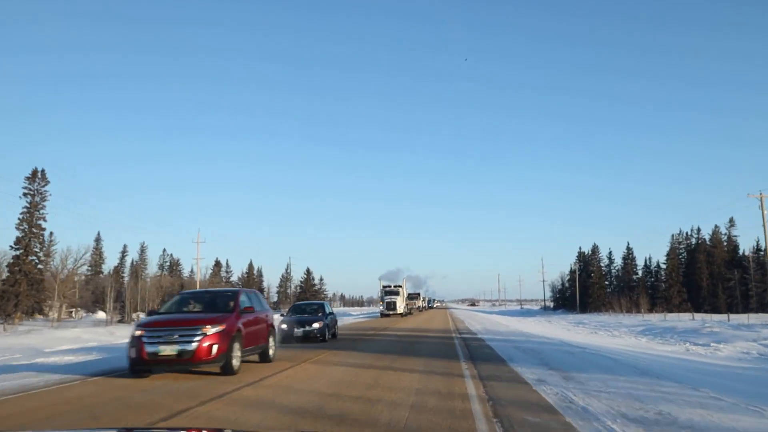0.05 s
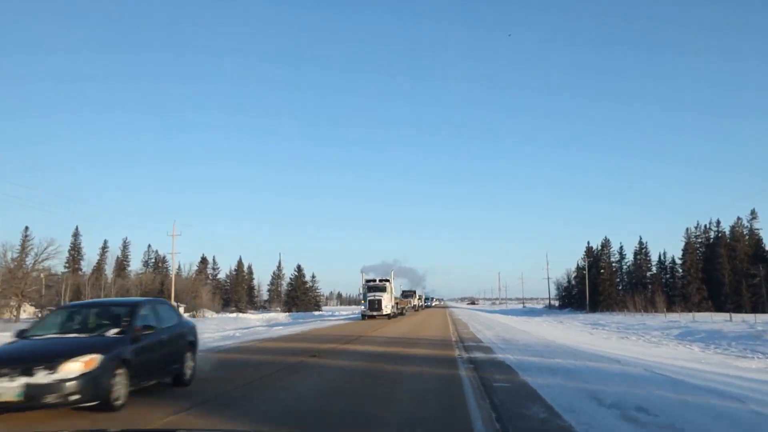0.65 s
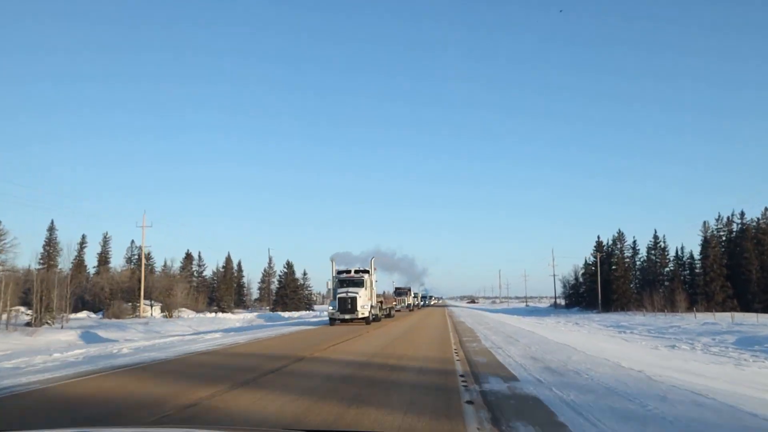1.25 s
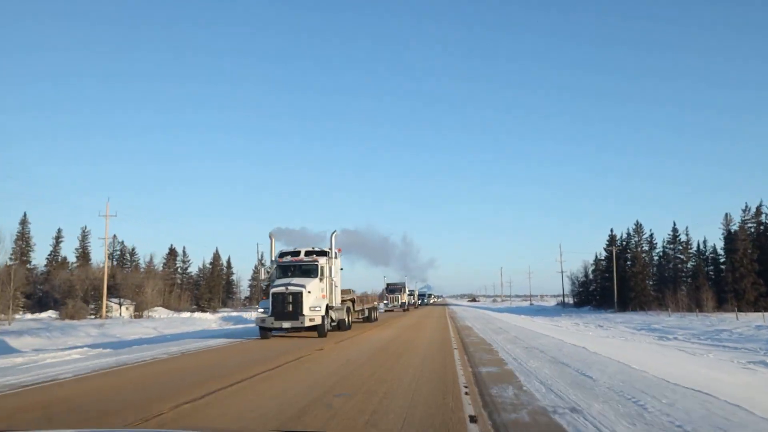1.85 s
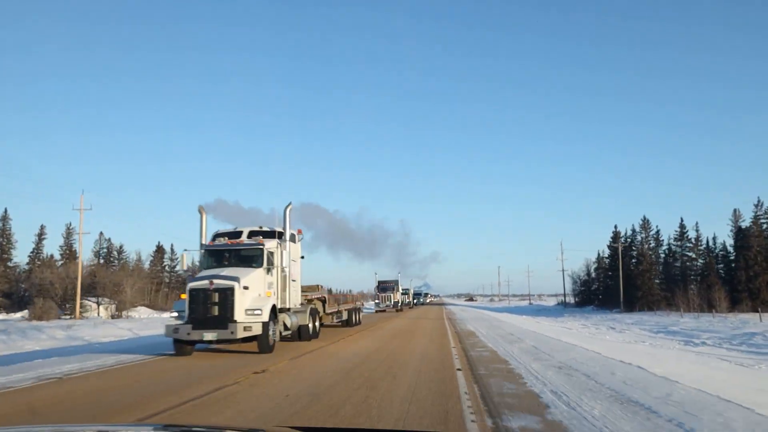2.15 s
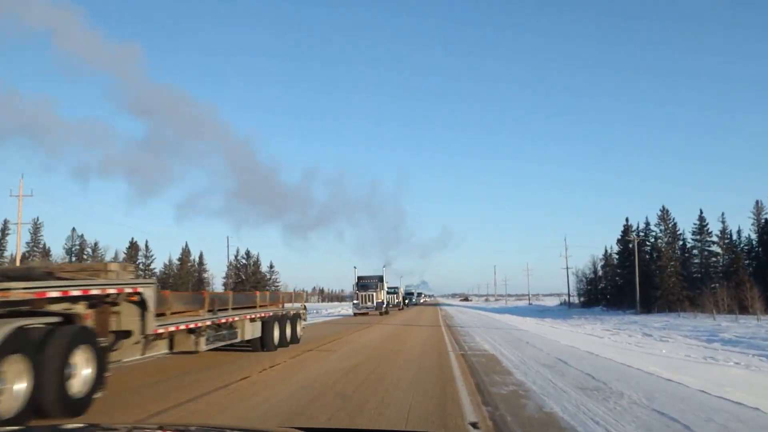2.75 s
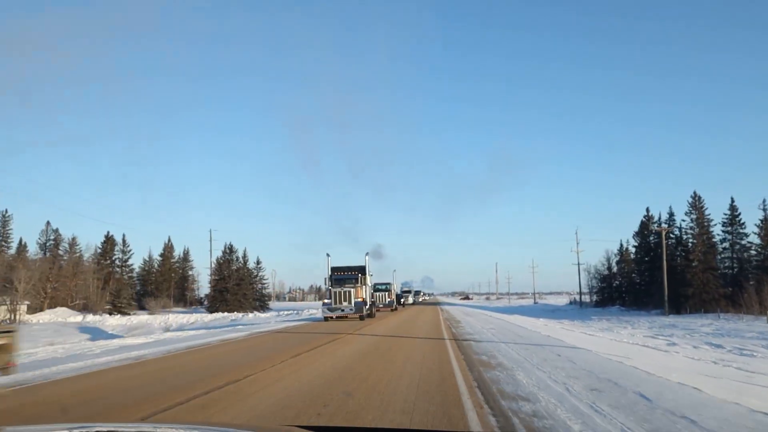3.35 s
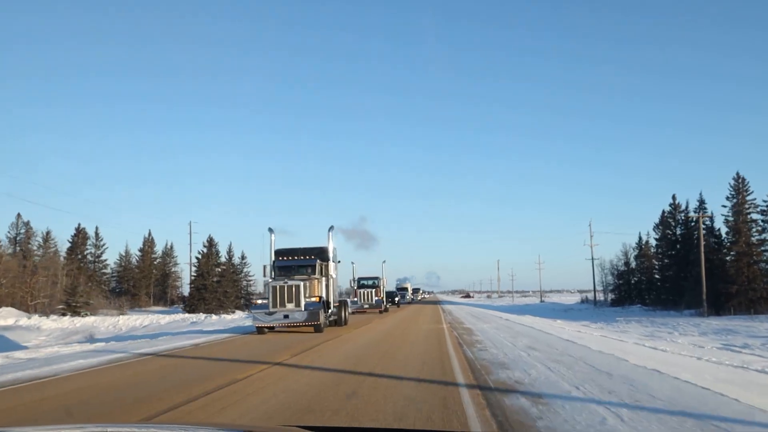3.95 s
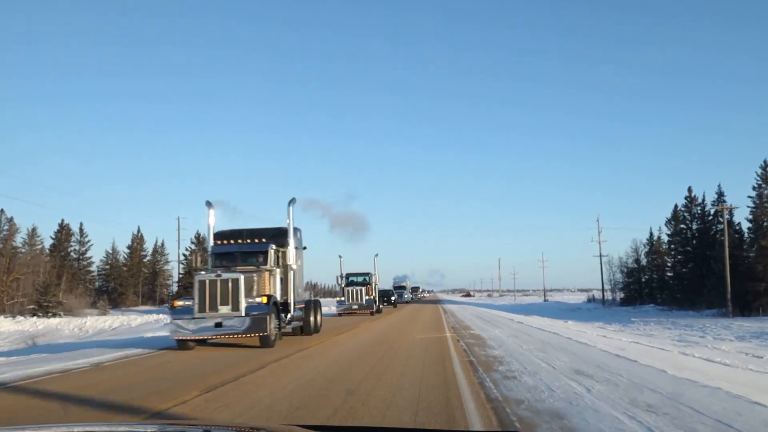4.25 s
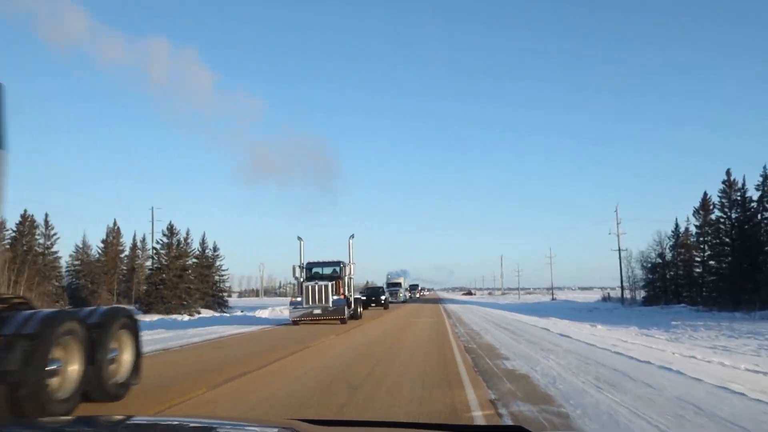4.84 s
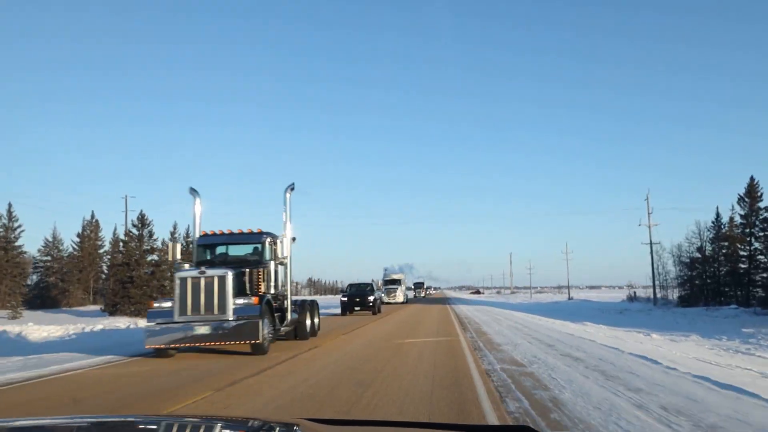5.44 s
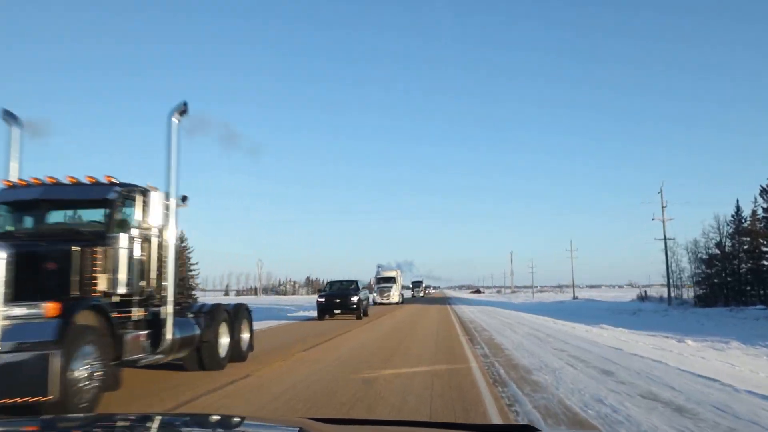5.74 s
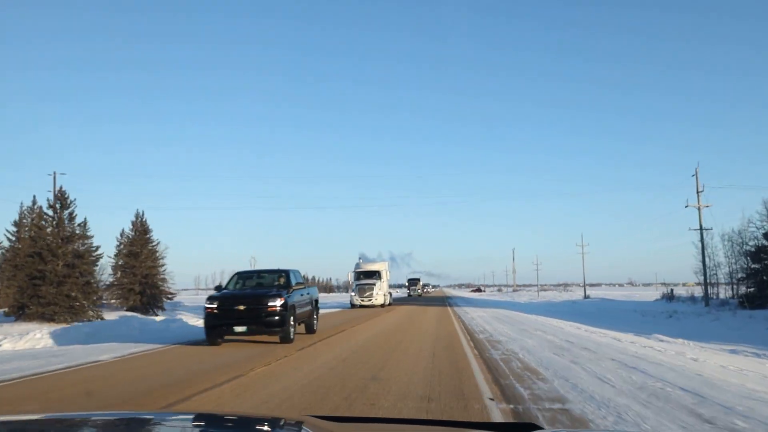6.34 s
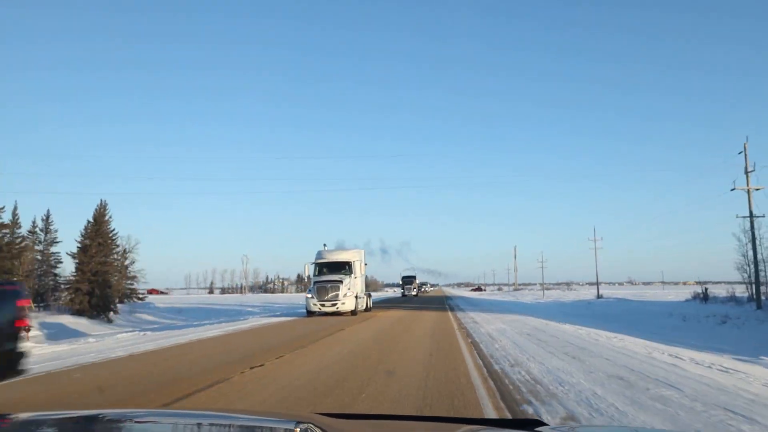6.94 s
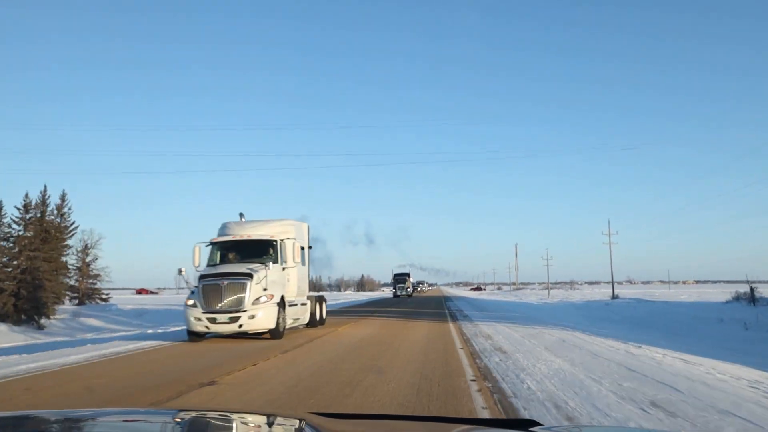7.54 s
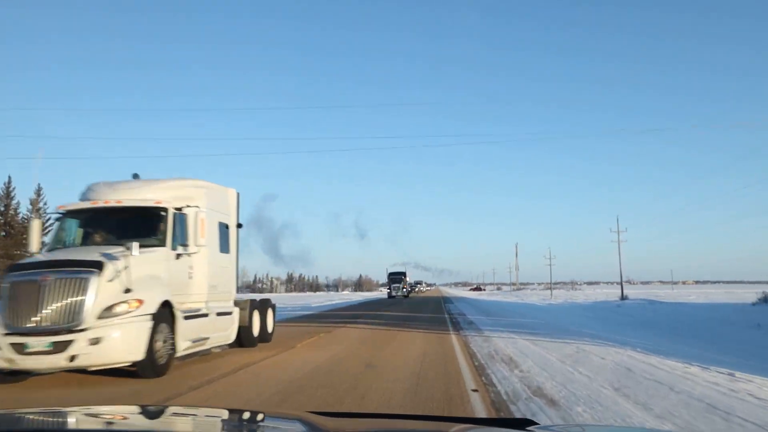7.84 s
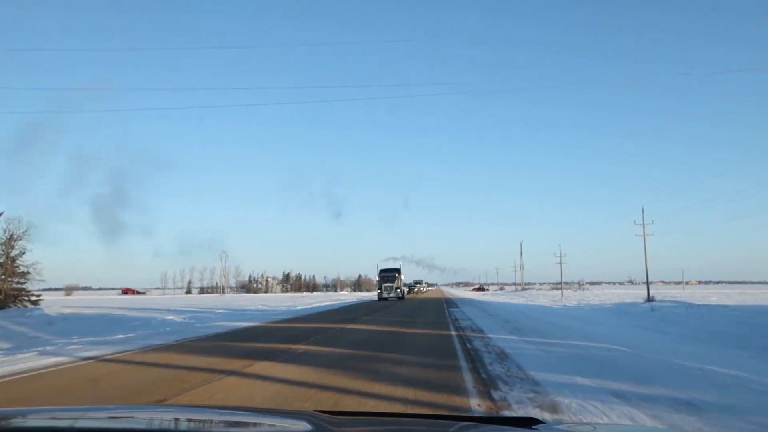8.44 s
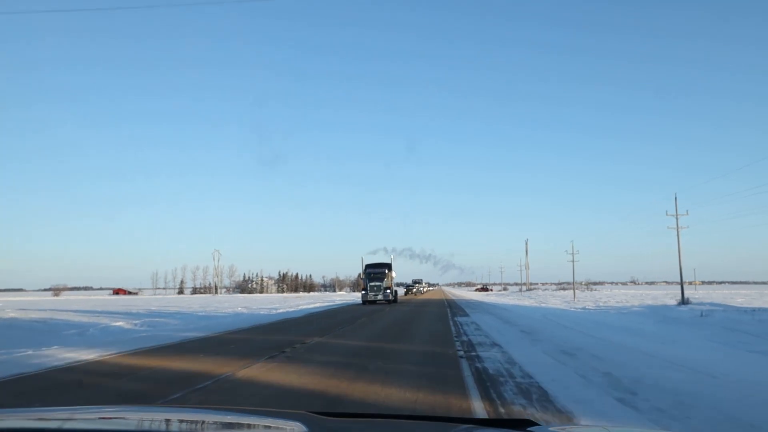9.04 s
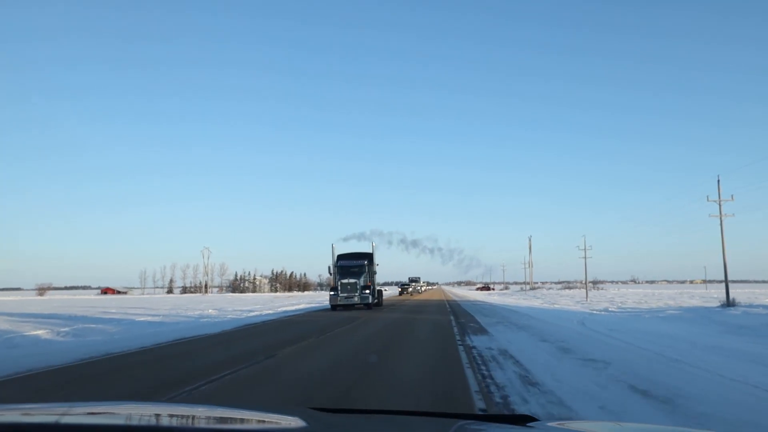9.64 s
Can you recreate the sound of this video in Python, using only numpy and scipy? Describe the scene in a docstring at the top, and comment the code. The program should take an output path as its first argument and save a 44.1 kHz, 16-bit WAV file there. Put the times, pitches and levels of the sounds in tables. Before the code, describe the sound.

From inside a cruising car, tyres roar and air hisses as traffic passes the other way, with soft bumps and faint trim ticks.

```python
"""Inside a car cruising on a winter highway, with cars and heavy trucks passing the other way.
The engine hums, the road rumbles through the body, tyres roar and air hisses on the glass.
Loose trim buzzes, ticks and squeaks. Bumps and passing traffic give short low thuds; bumps and
bow waves shake the cabin. Each truck's exhaust throbs, then drops in pitch as it goes by.
The camera's gain control ducks everything after each big thump."""
import sys
import numpy as np
from scipy.fft import rfft, irfft, next_fast_len
from scipy.io import wavfile
from scipy.ndimage import uniform_filter1d, map_coordinates

SR = 44100
rng = np.random.default_rng(int(sys.argv[2]) if len(sys.argv) > 2 else 0)


def unload_audio(sound):
    """Save the sound as a 16-bit wav file, at the path given as the first command line argument."""
    columns = np.transpose(np.atleast_2d(sound))
    # keep every value between -1 and 1, then stretch to whole-number steps
    steps = np.round(np.clip(columns, -1, 1) * 32767)
    wavfile.write(sys.argv[1], SR, steps.astype(np.int16))


N = 427329
TIME_S = np.arange(N) / SR
BURST_S = np.arange(SR // 4) / SR  # time axis of one tick or thud


def amp(db):
    """Decibels to gain."""
    return 10 ** (np.asarray(db) / 20)


def unit(x):
    """Scaled to rms 1."""
    return x / np.sqrt(np.mean(x ** 2) + 1e-20)


def curve(rows):
    """(time, value) points to one value per sample."""
    return np.interp(TIME_S, *np.transpose(rows))


def wobble(rate_hz):
    """Smooth random curve with knots at rate_hz."""
    knots = rng.standard_normal(int(N * rate_hz / SR) + 4)
    return map_coordinates(knots, [TIME_S * rate_hz])


def filtered(x, response):
    """x through a frequency response."""
    size = next_fast_len(N + SR // 2)
    return irfft(rfft(x, size) * response(np.fft.rfftfreq(size, 1 / SR)), size)[:N]


def colour(spectrum, hz):
    """Gain from (frequency, level) points joined on a log axis."""
    points_hz, db = np.transpose(spectrum)
    return amp(np.interp(np.log(hz + 1), np.log(points_hz), db))


def noise(spectrum):
    """Coloured noise, rms 1."""
    return unit(filtered(rng.standard_normal(N), lambda hz: colour(spectrum, hz)))


def evened(x, span_s):
    """x with swells slower than span_s levelled out, rms 1."""
    size = int(span_s * SR)
    power = uniform_filter1d(uniform_filter1d(x ** 2, size), size)
    return unit(x / np.sqrt(np.abs(power) + 1e-9))


def firing_note(hz, db, octave_db, rough_db, jitter_rad):
    """Cylinder firing tone plus octave, fluttering in level and timing."""
    phase = 2 * np.pi * np.cumsum(hz) / SR + jitter_rad * wobble(22)
    note = np.sin(phase) + amp(octave_db + 2.2 * wobble(4)) * np.sin(2 * phase)
    return amp(db + rough_db * wobble(14)) * unit(note)


# Engine pitch: (time [s], firing rate [Hz])
ENGINE_HZ = [(0, 93), (.4, 99), (1.2, 102.5), (2.7, 97.5), (3.5, 101), (4.3, 101.5), (4.7, 97), (5.5, 95.5),
             (8.2, 97), (9.69, 93.5)]
# Engine hum: (time [s], level [dB])
ENGINE_DB = [(0, -25.5), (.22, -15), (.65, -19), (.85, -21.5), (1.05, -16), (1.4, -16.5), (1.8, -19),
             (2.35, -20), (2.8, -13.5), (3.15, -23.5), (3.45, -22), (3.9, -14.5), (4.4, -15), (4.8, -19),
             (5.4, -17.5), (7.6, -19.5), (9.69, -18)]


def engine():
    """The car's own firing note follows the cruising speed."""
    return firing_note(curve(ENGINE_HZ), curve(ENGINE_DB), octave_db=-13.5, rough_db=2.5, jitter_rad=.16)


# Oncoming vehicles and rough patches, re steady level:
# (peak time [s], roar [dB], hiss [dB], half-width [s])
SWELLS = [(0.141, -2.5, -6.5, 0.22), (0.373, -7.5, -3.5, .045), (1.3, -5, -8.5, .15),
          (1.567, 0, -5.5, 0.082), (2.661, -6, -2.5, 0.16), (4.299, -11, -7, .3), (4.976, -2, -2.5, 0.18),
          (5.781, -2, -1.5, 0.073), (6.321, -6, -5, 0.2), (6.798, -5, -5.5, 0.095), (7.97, -4, -2.5, 0.31),
          (8.902, -7, -4, 0.36)]


def swells():
    """Added roar and hiss power; each swell falls off with distance squared."""
    roar = hiss = 0
    for peak_s, roar_db, hiss_db, half_width_s in SWELLS:
        spreading = 1 + ((TIME_S - peak_s) / half_width_s) ** 2
        roar += amp(roar_db) ** 2 / spreading
        hiss += amp(hiss_db) ** 2 / spreading
    return roar, hiss


# Suspension sway: (frequency [Hz], relative density [dB])
SWAY_SPECTRUM = [(10, -32), (20, -21), (29, -12.5), (37, -11), (44, -3), (54, -1), (64, -1), (85, -1),
                 (110, -3), (135, -14), (200, -45), (500, -120)]
# Body panel rumble: (frequency [Hz], relative density [dB])
PANEL_SPECTRUM = [(20, -61), (100, 0), (120, 2), (155, -2.5), (192, 0.5), (208, -4), (225, -0.5),
                  (275, -6.5), (340, -10), (400, -22), (550, -63), (1500, -120)]


def road(roar_power, coupling_db=-4):
    """Coarse pavement sways the suspension and shakes the panels; swells add to the shaking."""
    sway = amp(-21) * evened(noise(SWAY_SPECTRUM), span_s=.44)
    panels = amp(-18.5) * evened(noise(PANEL_SPECTRUM), span_s=.21)
    return sway + panels * np.sqrt(1 + amp(coupling_db) ** 2 * roar_power)


# Tyre roar: (frequency [Hz], relative density [dB])
TYRE_SPECTRUM = [(60, -59.5), (390, -4), (440, -2), (510, 1), (660, -3.5), (810, -3.5), (900, -7.5),
                 (1020, -6.5), (1250, -9), (1400, -8.5), (1550, -16), (2000, -25.5), (7000, -120)]
# Air on the glass: (frequency [Hz], relative density [dB])
AIR_SPECTRUM = [(300, -72), (1600, 5), (1950, 1), (2500, 0.5), (3000, -4.5), (3350, -2.5), (3700, -4),
                (4300, -12), (4900, -13.5), (5300, -21), (6200, -22), (8000, -29.5), (11000, -30.6),
                (15600, -35.5)]


def tyres_and_air(roar_power, hiss_power):
    """Tyre roar and air hiss, ruffled by turbulence, swelling as traffic passes."""
    gust = wobble(17)
    tyres = amp(-29 + .51 * gust) * evened(noise(TYRE_SPECTRUM), span_s=.78)
    air = amp(-42.5 + .12 * gust + .36 * wobble(40)) * noise(AIR_SPECTRUM)
    return tyres * np.sqrt(1 + roar_power) + air * np.sqrt(1 + hiss_power)


# Trim contact snap: (frequency [Hz], relative density [dB])
SNAP_SPECTRUM = [(800, -30), (2000, -7), (3500, 0), (4800, -3), (6400, -5), (9000, -9.5), (13000, -17),
                 (15600, -23)]


def trim_chatter(level_db=-68, swing_db=3.5):
    """Vibrating loose trim buzzes faintly, in fits."""
    fits = unit(wobble(7) + wobble(25))
    return amp(level_db + swing_db * fits) * noise(SNAP_SPECTRUM)


def trim_contacts(rows, q, rise_share=.1):
    """Plastic contacts: noise bursts, each a dull resonance plus a broad snap."""
    out, t = np.zeros(N + SR), BURST_S
    hz = np.fft.rfftfreq(len(t), 1 / SR) + 1
    scrape = lambda band: unit(irfft(rfft(rng.standard_normal(len(t))) * band, len(t)))
    for start_s, db, centre_hz, snap_db, t60_s in rows:
        lowpass = 1 / (1 + (hz / (1.7 * centre_hz)) ** 4)
        resonance = lowpass / (1 + 1j * q * (hz / centre_hz - centre_hz / hz)) ** 2
        contact = amp(db) * scrape(resonance) + amp(snap_db) * scrape(colour(SNAP_SPECTRUM, hz))
        burst = amp(-60 * t / t60_s) * (1 - np.exp(-(t / (rise_share * t60_s)) ** 2))
        out[round(start_s * SR):][:len(t)] += burst / burst.max() * contact
    return out[:N]


# Trim ticks: (time [s], resonance [dB], centre [Hz], snap [dB], t60 [s])
TRIM_TICKS = [(.345, -55, 3500, -57, .14), (.776, -37, 3300, -50, .08), (.803, -38.5, 2300, -68, .09),
              (.805, -40.5, 3500, -70, .08), (.852, -52, 4500, -58, .08), (1.125, -52, 3500, -60, .15),
              (1.371, -49, 3600, -50.5, .12), (1.582, -54, 3700, -54, .11), (2.1, -44.5, 3400, -51.5, .09),
              (2.174, -53, 5200, -59.5, .08), (2.27, -50, 3800, -59, .06), (2.708, -49, 3700, -60, .07),
              (3.209, -53, 5600, -62, .035), (3.308, -53, 3700, -61, .09), (4.254, -44, 3650, -70, .06),
              (4.426, -39, 3000, -62, .075), (4.482, -57, 11000, -53.5, .08), (4.623, -58, 6000, -55, .08),
              (4.772, -52, 3700, -59, .06), (4.848, -63, 10500, -57, .08), (5.053, -49, 3600, -57, .07),
              (5.113, -42, 3500, -58, .07), (5.54, -36, 3300, -52, .09), (5.794, -46, 3600, -56, .09),
              (8.284, -43, 3500, -52, .13), (8.65, -55, 6000, -63, .06), (9.047, -46, 3600, -53.5, .14),
              (9.512, -54, 5400, -61, .035)]


def trim_ticks(faint_count=22, snap_db=-65, t60_s=.06):
    """Loose trim taps with a broad resonance; faint ticks are scattered between the listed ones."""
    faint = []
    for _ in range(faint_count):
        start_s, db = rng.uniform(0, N / SR), rng.normal(-54, 1.5)
        centre_hz = 3500 * rng.lognormal(0, .1)
        faint.append((start_s, db, centre_hz, snap_db, t60_s))
    return trim_contacts(TRIM_TICKS + faint, q=1.8)


# Cabin thuds: (time [s], level [dB], pitch [Hz])
THUDS = [(.405, -6, 100), (.436, -11.5, 232), (.449, 1, 80), (0.501, -10, 65), (0.576, -1, 85),
         (0.955, -6, 100), (1.012, -7, 100), (1.611, -1.5, 151), (1.634, 0, 74), (1.704, -1, 80),
         (2.35, -6, 167), (2.936, -4.5, 141), (3.089, -7.5, 139), (3.749, -5.5, 78), (5.076, -8, 90),
         (5.218, -11, 70), (5.821, -8.5, 87), (5.933, -3, 75), (6.857, -12, 85), (8.125, -6, 65)]


def thuds(t60_s=.046, rise_s=.0039):
    """Short, low, heavily damped thuds in the cabin, from bumps and passing traffic."""
    out, t = np.zeros(N + SR), BURST_S
    push = amp(-60 * t / t60_s) * (1 - np.exp(-t / rise_s))
    push /= push.max()
    for start_s, db, hz in THUDS:
        out[round(start_s * SR):][:len(t)] += amp(db) * push * np.sin(2 * np.pi * hz * t)
    return out[:N]


# Cabin air and panel modes: (centre [Hz], width [Hz], relative level [dB])
CABIN_MODES = [(43.3, 5.2, -15.5), (63, 19, -10), (82.4, 25.3, 0.5), (101.5, 13.2, 2.5), (198, 24, -19)]


def cabin_response(hz):
    """Resonant modes summed with alternating sign."""
    return sum((-1) ** k * amp(db) * 1j * hz * width_hz / (mode_hz ** 2 - hz ** 2 + 1j * hz * width_hz)
               for k, (mode_hz, width_hz, db) in enumerate(CABIN_MODES))


# Bumps and bow waves: (time [s], shudder [dB], boom [dB], t60 [s])
JOLTS = [(.47, -12.5, -17.5, 1.2), (.96, -19.5, -19.5, 0.86), (1.639, -10.5, -21.5, 0.99),
         (3.05, -24, -19.5, 0.65), (3.76, -12.5, -21.5, 0.5), (5.1, -20, -10.5, 1), (5.851, -21, -16, 1),
         (6.91, -21, -19, 1.5), (8.16, -16.5, -14.5, 1.2), (8.98, -17.5, -17.5, 1.5)]


def jolts(boom_hz=54, rise_share=.056):
    """Each jolt shudders the panels and rings the cabin's lowest air mode; long ones build slowly."""
    shudder_gain, boom_gain = np.zeros(N), np.zeros(N)
    for peak_s, shudder_db, boom_db, t60_s in JOLTS:
        t = TIME_S - peak_s
        rise = np.exp(-(np.minimum(t, 0) / (rise_share * t60_s)) ** 2)
        decay = amp(-60 * np.maximum(t, 0) / t60_s)
        shudder_gain += amp(shudder_db) * rise * decay
        boom_gain += amp(boom_db) * rise * decay
    shaking = noise([(20, -11.5), (45, -5), (200, 1.5), (500, -20.5), (2500, -120)])
    shudder = evened(filtered(shaking, cabin_response), span_s=.011)
    boom = unit(np.sin(2 * np.pi * boom_hz * TIME_S + .31 * wobble(11)))
    return shudder_gain * shudder + boom_gain * boom


# Trim squeaks: (time [s], resonance [dB], pitch [Hz], snap [dB])
TRIM_SQUEAKS = [(2.137, -51.5, 4850, -55.5), (2.828, -52, 5050, -50), (5.196, -52, 4600, -58)]


def trim_squeaks(t60_s=.07):
    """Trim contacts with a resonance narrow enough to have a pitch."""
    return trim_contacts([(*row, t60_s) for row in TRIM_SQUEAKS], q=16)


# Oncoming trucks:
# (passing time [s], hold before passing [s], approach firing rate [Hz],
#  level [dB], octave [dB], jitter [rad])
TRUCKS = [(2.97, 0.8, 79.97, -17.5, -0.5, .65), (5.151, 1.6, 111.9, -24.5, -10.5, .25),
          (6.42, .95, 75.1, -23, 11, .55), (8.25, 0.41, 80.4, -25.5, 11, 0.41)]


def truck_exhausts(rise_s=.17, fade_s=.09, doppler_drop=.2, doppler_s=.17, firings_per_turn=3):
    """Each exhaust swells, holds as the truck nears, then drops in pitch and fades."""
    out = np.zeros(N)
    for passing_s, hold_s, approach_hz, level_db, octave_db, jitter_rad in TRUCKS:
        t = TIME_S - passing_s
        hz = approach_hz * (1 - doppler_drop * (1 + np.tanh(t / doppler_s)) / 2)
        away = np.maximum(-t - hold_s, 0) / rise_s + np.maximum(t, 0) / fade_s
        db = level_db - 20 * np.log10(1 + away ** 2)
        turbulence = amp(db - 9) * noise([(25, -50.5), (75, -3), (190, -3), (300, -9.5), (900, -120)])
        note = firing_note(hz, db, octave_db, rough_db=.1, jitter_rad=jitter_rad)
        crank_rad = 2 * np.pi * np.cumsum(hz) / SR / firings_per_turn
        throb = unit(1 + .55 * np.sin(crank_rad))  # unequal cylinders: once per turn
        out += throb * (note + turbulence)
    return out


def gain_control(x, ceiling_db=-9.5, detect_s=.025, recover_s=.7):
    """Ducks quickly when the level passes the ceiling, then creeps back up."""
    size = int(detect_s * SR)
    level_db = 10 * np.log10(np.abs(uniform_filter1d(x ** 2, size)) + 1e-9)
    excess_db = np.maximum(level_db - ceiling_db, 0)
    release = np.exp(-TIME_S / recover_s)
    cut_db = np.maximum.accumulate(excess_db / release) * release
    return x * amp(-uniform_filter1d(cut_db, size))


def scene():
    """Mono mix at the front seat."""
    roar_power, hiss_power = swells()
    rumble = engine() + truck_exhausts() + road(roar_power) + jolts()
    rush = tyres_and_air(roar_power, hiss_power)
    trim = trim_ticks() + trim_squeaks() + trim_chatter()
    return (rumble + rush + trim + thuds())[None]


def record(dry):
    """Camera chain: gain control, soft clip, band limit."""
    clip_level, top_hz = .9, 15700
    ducked = gain_control(dry[0])
    rounded = ducked / (1 + np.abs(ducked / clip_level) ** 8) ** (1 / 8)
    return filtered(rounded, lambda hz: hz < top_hz)[None]


dry = scene()
out = record(dry)
unload_audio(out)
```